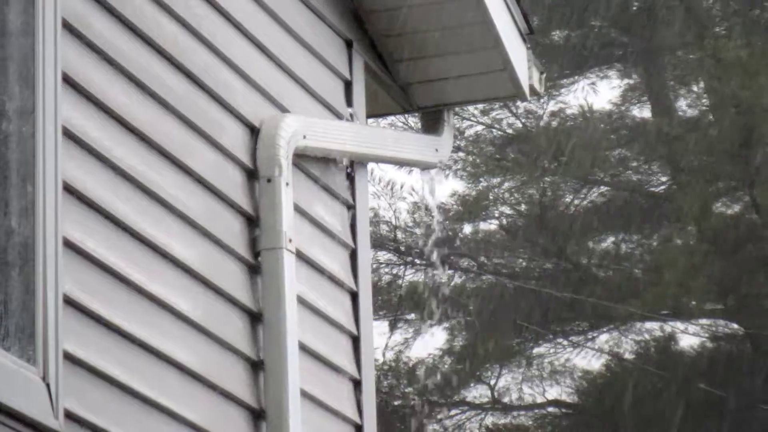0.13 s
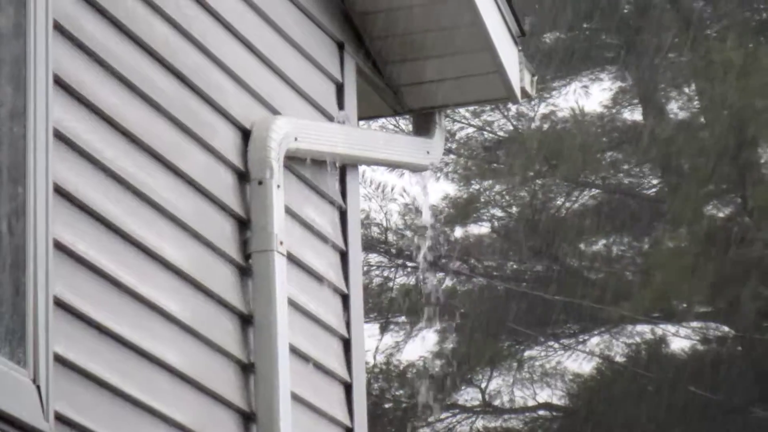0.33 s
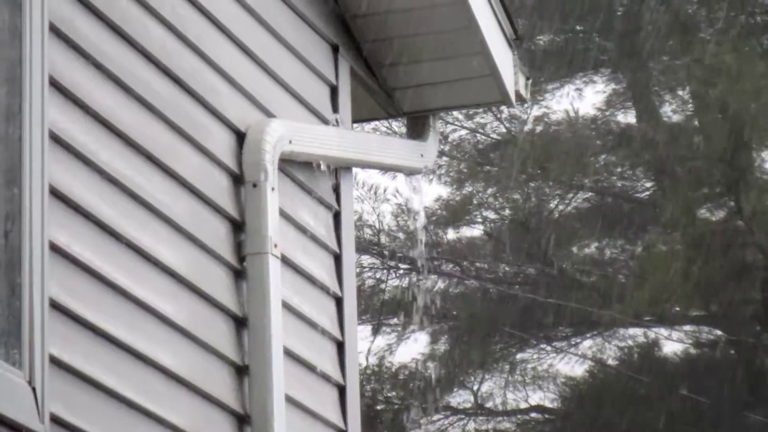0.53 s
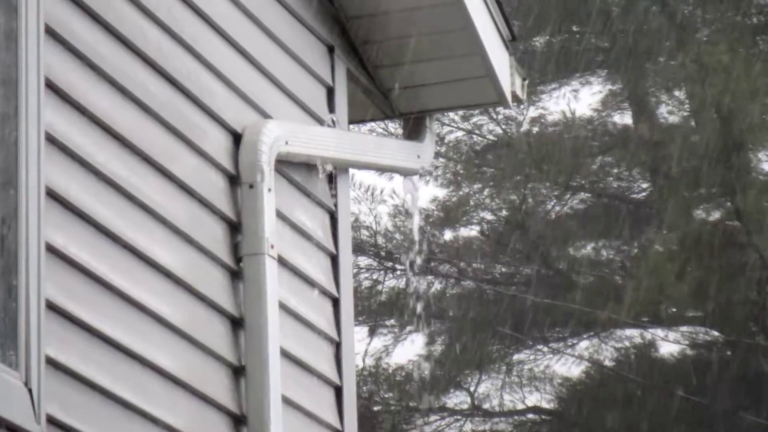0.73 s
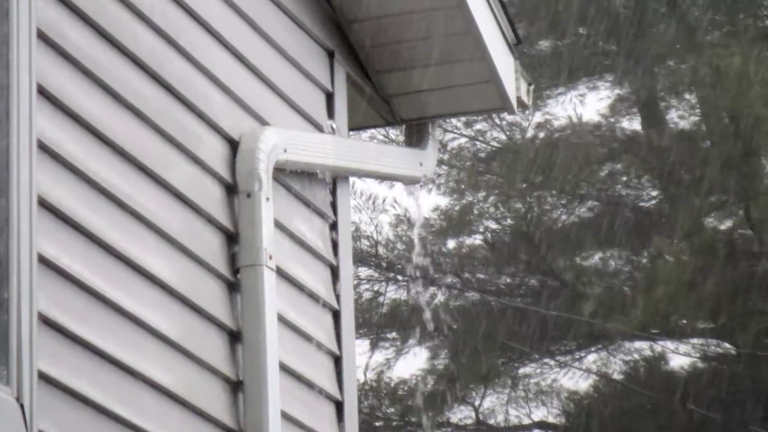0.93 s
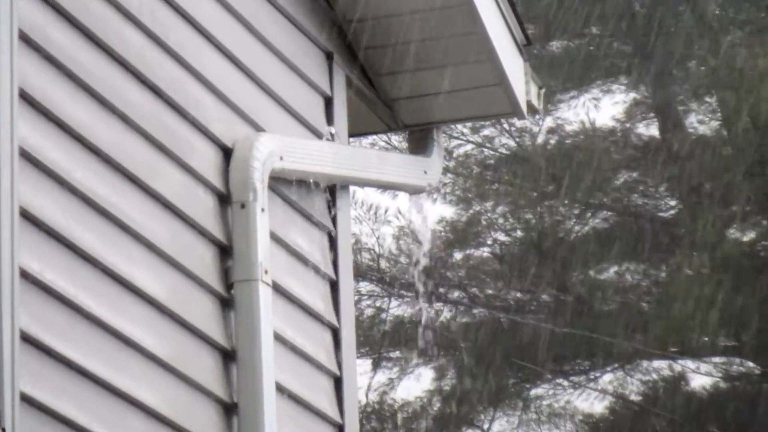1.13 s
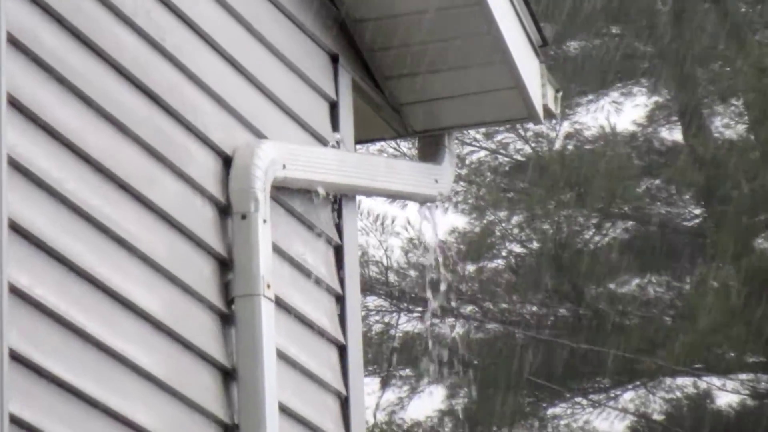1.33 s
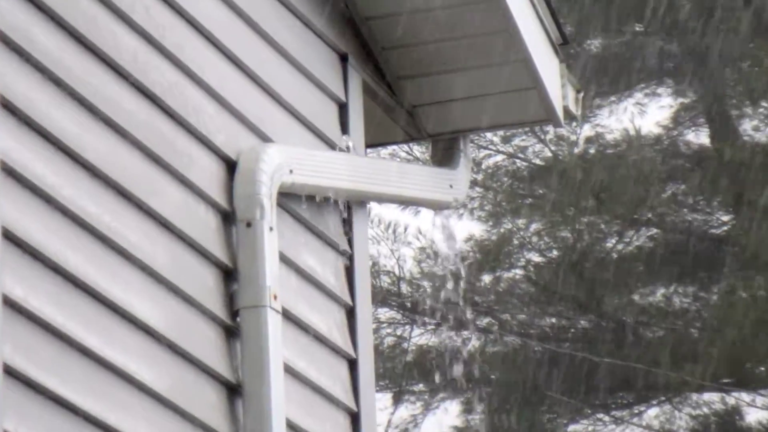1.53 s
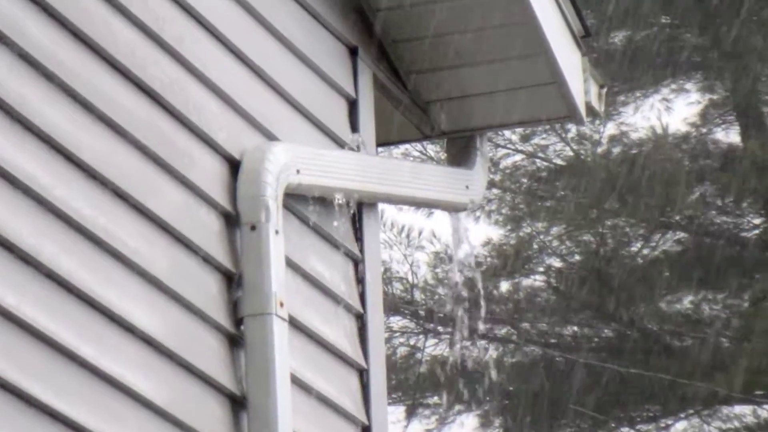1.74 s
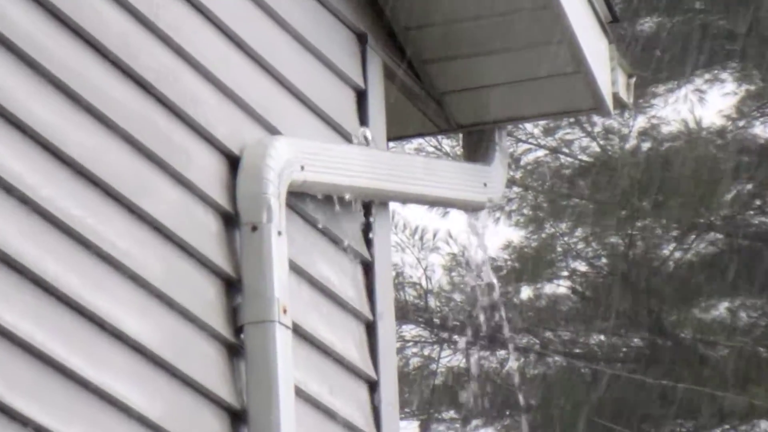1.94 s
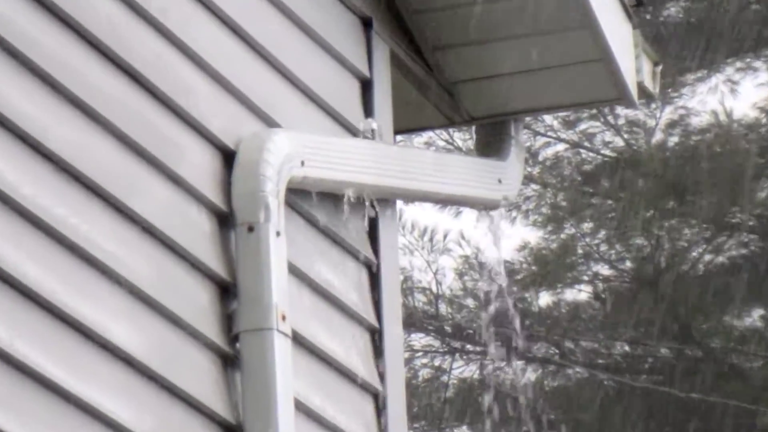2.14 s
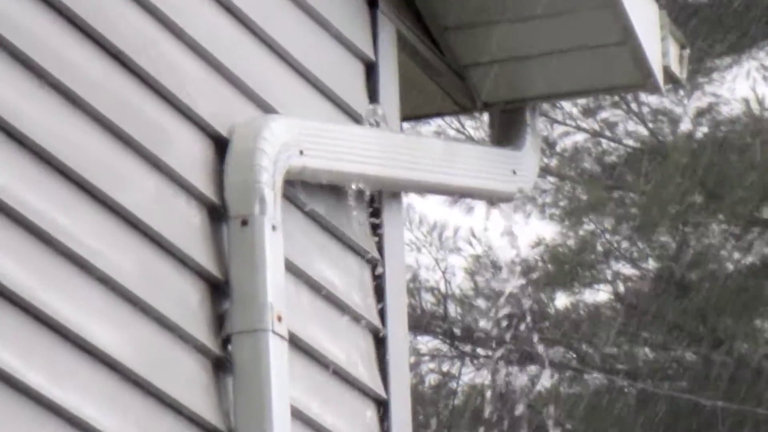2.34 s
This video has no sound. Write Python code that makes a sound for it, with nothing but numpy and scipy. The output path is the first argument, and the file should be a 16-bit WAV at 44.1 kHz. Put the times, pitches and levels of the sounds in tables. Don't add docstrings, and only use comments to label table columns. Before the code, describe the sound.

Dense downpour on a house wall and gutter, close drips plopping, one sharp crack on the camera

```python
import sys
import numpy as np
from scipy import signal
from scipy.fft import rfft, irfft
from scipy.io import wavfile
from scipy.ndimage import uniform_filter1d

SR = 44100
rng = np.random.default_rng(int(sys.argv[2]) if len(sys.argv) > 2 else 0)


def gain_from_decibels(decibels):
    exponent = np.asarray(decibels, float) / 20
    return 10 ** exponent


def log_audio(samples):
    frames = np.atleast_2d(samples).T
    limited = np.clip(frames, -1, 1)
    pcm = np.round(limited * 32767).astype(np.int16)
    wavfile.write(sys.argv[1], SR, pcm)


N = 105840

# (frequency [Hz], level per Hz [dB])
PATTER_MID = [(18, -72), (30, -31), (104, -15.5), (383, -11.5), (1030, -2.5), (1750, -3), (2070, -7.5),
              (3280, -12.5), (4600, -20.5), (5980, -32), (10100, -120)]
# (frequency [Hz], level per Hz [dB])
PATTER_SIDE = [(18, -72), (30, -30), (375, -23), (636, -18), (721, -17), (1750, -3), (2960, -9), (3220, -8),
               (4600, -12), (5980, -46), (10100, -120)]
# (frequency [Hz], level per Hz [dB])
SPRAY_MID = [(2530, 8), (4300, -19), (5130, -2.5), (6460, 1.5), (7350, -3), (8970, -5), (10100, -12.5),
             (14400, -18), (15500, -23)]
# (frequency [Hz], level per Hz [dB])
SPRAY_SIDE = [(2530, -35), (4300, -15), (5000, 0), (6500, 0.5), (7310, -4.5), (8920, -3.5), (12600, -14),
              (14400, -21), (15500, -35)]
# (frequency [Hz], level per Hz [dB])
SPLASH_MID = [(1500, 2), (2000, 10), (3900, 5), (4250, -28), (7000, -11), (8800, -1), (10500, -11.5),
              (13000, -26), (15500, -33)]
# (frequency [Hz], level per Hz [dB])
SPLASH_SIDE = [(1500, -22), (2200, -3), (3900, 5), (4250, -32), (7000, -6), (8800, -1), (10500, -6),
               (13000, -26), (15500, -30)]
# (time [s], level [dB])
POUR = [(.1, 0), (.2, -2.5), (.35, -1), (.6, -1), (.85, -0.5), (1.15, -1), (1.4, 0), (1.8, 0), (2.0, 0),
        (2.4, 0.5)]
# (time [s], level [dB])
SPLASH = [(.1, -33.5), (.35, -30.5), (.6, -30), (.8, -31.5), (.88, -47), (1.2, -57), (2.4, -42.5)]
# (time [s], peak level [dB], pitch [Hz], time to fade by 60 dB [s], left over right [dB])
PLOPS = [(0.6184, -12.5, 670, 0.0075, -8), (0.6197, -5, 2400, .022, -6), (.666, -10, 1800, 0.013, -12),
         (.698, -8.5, 1860, 0.013, -13), (0.7606, -14, 1170, 0.024, -16), (.7718, -5.5, 1280, 0.021, -8),
         (0.776, 0, 1530, 0.013, -10), (.78, -6, 1700, 0.022, -3), (0.782, -5, 2250, .025, -5),
         (0.7866, -8.5, 1610, 0.025, -5), (0.7897, -9, 1170, 0.022, -6), (0.7941, -9.5, 1470, 0.026, -4),
         (.7985, -9, 900, 0.013, -14), (0.994, -15, 1570, 0.023, 1), (1.191, -17, 1643, 0.05, -.6),
         (1.31, -12.5, 1050, 0.027, 1.5), (1.469, -13, 1560, 0.032, -1.5), (1.716, -15.5, 1570, 0.018, -1),
         (2.0423, -8, 1000, .01, -1.5), (2.0455, -12, 2700, 0.0094, -4), (2.0453, -3.5, 1634, 0.014, 1),
         (2.145, -12, 1510, .02, -1), (2.201, -6, 1590, 0.023, 3), (2.3, -17, 1750, .02, -3),
         (2.365, -10, 1500, .03, -1)]
# (pitch [Hz], level [dB], time to fade by 60 dB [s])
HOUSING = [(900, -10, 0.0044), (2430, -11, .02), (3170, -1, 0.03), (3400, -3, .012), (3630, -3.5, .015),
           (3950, -16, .12)]
# (time [s], level [dB])
TICKS = [
    (0.6204, -20),
    (0.6324, -31),
    (0.9044, -34),
    (1.1293, -31),
    (1.269, -35),
    (1.4626, -33),
    (1.509, -23),
    (1.5833, -26),
    (1.819, -42),
    (2.045, -23),
]
# (time [s], level [dB], pitch [Hz])
THUMPS = [
    (.617, -35, 162),
    (.776, -29, 400),
    (.79, -17, 297),
    (2.043, -28, 71.4),
    (2.095, -22, 91),
]
# (time [s], depth [dB])
DUCKS = [
    (0.6205, 8.5),
    (0.799, 9.5),
    (2.047, 6.5),
    (2.0984, 30),
]
# (frequency [Hz], width [Hz], level [dB])
MIC = [(1700, 160, 1.5), (2250, 430, 0.5), (3000, 97, -4), (3190, 310, 3), (6370, 460, 3.5)]


def evened(x):
    return x / np.sqrt(np.mean(x ** 2) + 1e-20)


def curve(points):
    s, value = np.transpose(points)
    return np.interp(np.arange(N) / SR, s, value)


def coloured(x, points):
    f, db = np.transpose(points)
    hz = np.fft.rfftfreq(N, 1 / SR)
    level = np.interp(np.log(hz + 1), np.log(f + 1), db, left=-99, right=-99)
    return evened(irfft(rfft(x) * gain_from_decibels(level), N))


def add(mix, s, sound):
    part = mix[:, round(s * SR):][:, :sound.shape[1]]
    part += sound[:, :part.shape[1]]


def band_noise(low_hz, high_hz, order, noise):
    return signal.sosfilt(signal.butter(order, [low_hz, high_hz], "band", fs=SR, output="sos"), noise)


def hiss(patchy_db, flicker_db):
    frames = N // 64 + 5
    a, b, c, d, patches = rng.standard_normal((frames, 129, 5)).T
    patches = uniform_filter1d(patches, size=5, axis=0)
    patches = evened(uniform_filter1d(patches, size=30, axis=1))
    flicker = evened(uniform_filter1d(rng.standard_normal(frames), size=6))
    z = np.array([a + 1j * b, c + 1j * d]) * gain_from_decibels(patchy_db * patches + flicker_db * flicker)
    return evened(signal.istft(z, nperseg=256, noverlap=192)[1][:, :N])


def grains(low_hz, high_hz, cycles, per_s, spread_db):
    falls = rng.random(N) < per_s / SR
    size = gain_from_decibels(spread_db * np.minimum(rng.exponential(1, N), 4.5)) * falls
    kind = rng.integers(0, 24, N)
    bearing = rng.standard_normal(N)
    out = np.zeros((2, N))
    for k, hz in enumerate(np.geomspace(low_hz, high_hz, num=24)):
        u = np.arange(600) / SR * hz
        swing = np.sin(2 * np.pi * u * (1 + 0.031 * u))
        tone = np.minimum(u / 0.22, 1) * np.exp(-2 * u / cycles) * swing
        tone = tone / np.linalg.norm(tone) * np.sqrt(hz)
        train = size * (kind == k)
        out += signal.oaconvolve([train, train * bearing], tone[None], axes=1)[:, :N]
    return np.array([evened(v) for v in out])


def layer(source, mid, side, mid_db, side_db):
    m = gain_from_decibels(mid_db) * coloured(source[0], mid)
    s = gain_from_decibels(side_db) * coloured(source[1], side)
    return np.array([m + s, m - s])


def thump(start, db, hz):
    u = np.arange(0, 3 / hz, 1 / SR) * hz
    return start, gain_from_decibels(db + np.array([[-1.5], [1.5]])) * np.sin(2 * np.pi * u) * np.exp(-1.6 * u)


def tick(start, db):
    t = np.arange(0, .006, 1 / SR)
    burst = rng.standard_normal((2, len(t))) * np.exp(-t / 0.00084)
    return start, gain_from_decibels(db + 3) * band_noise(3500, 11000, 2, burst)


def crack():
    length_s = .0021
    t = np.arange(0, .06, 1 / SR)
    a, b = rng.standard_normal((2, len(t))) * (t < length_s) * gain_from_decibels(-4 * t / length_s)
    bright = band_noise(6500, 15500, 3, [a, 1.2 * b - .5 * a])
    late = np.maximum(t - length_s, 0)
    ring = np.zeros((2, len(t)))
    for hz, db, t60 in HOUSING:
        phase = hz * t + rng.random((2, 1)) / 4
        ring += gain_from_decibels(db - 60 * late / t60) * np.sin(2 * np.pi * phase)
    ring *= np.minimum(t / .0002, 1) * gain_from_decibels([[-3], [0]])
    return 2.0971, gain_from_decibels(-3.5) * (1.16 * bright + ring)


def plop(start, db, hz, t60, pan_db):
    t = np.arange(0, .06, 1 / SR)
    ring = np.sin(2 * np.pi * hz * t)
    ring += 0.24 * np.sin(2 * np.pi * hz * 1.3 * t)
    ring += 0.46 * np.sin(2 * np.pi * hz * 0.628 * t)
    noise = rng.standard_normal(len(t)) + 0.21 * rng.standard_normal((2, len(t)))
    spatter = band_noise(0.49 * hz, 1.63 * hz, 3, noise)
    rise = np.sin(np.pi / 2 * np.minimum(t / 0.00047, 1)) ** 2
    body = rise * (ring + .4 * spatter) * gain_from_decibels(-60 * t / t60)
    return start, gain_from_decibels(db + np.array([[pan_db / 2], [-pan_db / 2]])) * body


def splash():
    drops = hiss(patchy_db=-0.3, flicker_db=2.2) + gain_from_decibels(-9.5) * grains(2000, 11300, 4, 1500, 2.4)
    level = curve(SPLASH) + np.array([[-2.5], [2.5]])
    return layer(drops, SPLASH_MID, SPLASH_SIDE, 0, -5.5) * gain_from_decibels(level)


def spray():
    drops = hiss(patchy_db=0.7, flicker_db=1.95) + gain_from_decibels(-5) * grains(4750, 12400, 1.2, 1200, 3.0)
    return layer(drops, SPRAY_MID, SPRAY_SIDE, -38.5, -39.5)


def patter():
    drops = hiss(patchy_db=0.12, flicker_db=-1.1) + gain_from_decibels(-10) * grains(521, 4040, 2.5, 2500, 2.8)
    return layer(drops, PATTER_MID, PATTER_SIDE, -22, -33)


def rain():
    return (patter() + spray()) * gain_from_decibels(curve(POUR)) + splash()


def scene():
    lean_db = -1.2
    mix = rain() * gain_from_decibels([[lean_db / 2], [-lean_db / 2]])
    for source, table in ((plop, PLOPS), (tick, TICKS), (thump, THUMPS)):
        for row in table:
            add(mix, *source(*row))
    add(mix, *crack())
    return mix


def gain_control(t):
    snap_s, recover_db_per_s = 0.0051, 10
    down = [np.clip((t - s) / snap_s, 0, 1) * (db - recover_db_per_s * (t - s)) for s, db in DUCKS]
    return gain_from_decibels(-np.maximum(np.max(down, axis=0), 0))


def microphone(hz):
    edge_hz, bass_cut_hz = 15450, 60
    colour = gain_from_decibels(sum(db / (1 + ((hz - f) / w) ** 2) for f, w, db in MIC))
    return colour / np.sqrt(1 + (hz / edge_hz) ** 60) * hz ** 2 / (hz ** 2 + bass_cut_hz ** 2)


def motor_notches(hz):
    whine_hz, width_hz, depth = 1024.6, 42, .97
    cuts = [1 - depth / (1 + 1j * (hz - k * whine_hz) / width_hz) for k in range(2, 7)]
    return np.prod(cuts, axis=0)


def roll_off(x):
    return signal.sosfilt(signal.butter(12, 17050, fs=SR, output="sos"), x)


def record(dry):
    start_s, fade_in_s, ceiling = 0.089, 0.017, 1.25
    t, hz = np.arange(N) / SR, np.fft.rfftfreq(N, 1 / SR)
    ducked = dry * gain_control(t) + gain_from_decibels(-84) * rng.standard_normal(dry.shape)
    wet = irfft(rfft(ducked * (t > start_s)) * microphone(hz) * motor_notches(hz), N)
    wet = wet * np.clip((t - start_s) / fade_in_s, 0, 1)
    mix = ceiling * np.tanh(wet / ceiling)
    return roll_off(mix)


dry = scene()
out = record(dry)
log_audio(out)
```